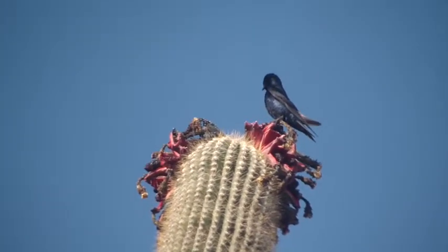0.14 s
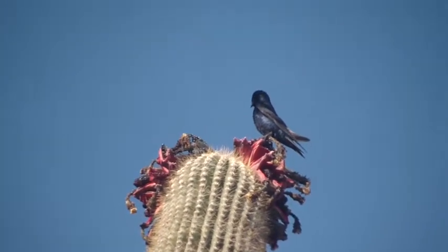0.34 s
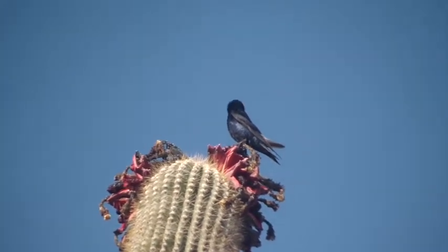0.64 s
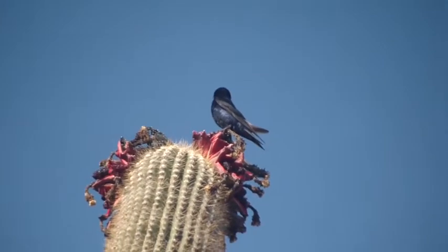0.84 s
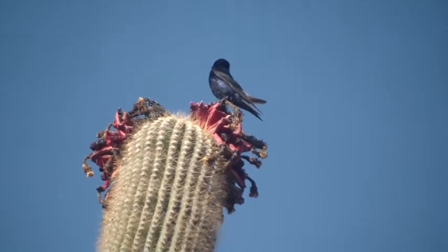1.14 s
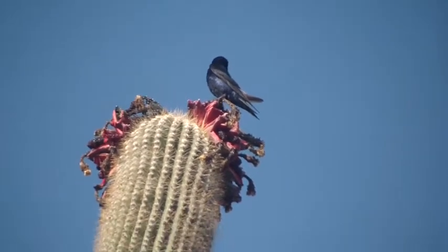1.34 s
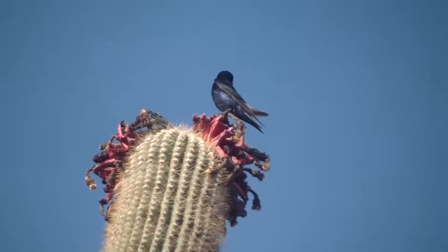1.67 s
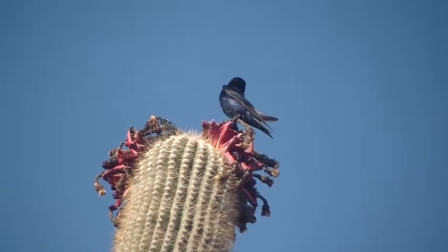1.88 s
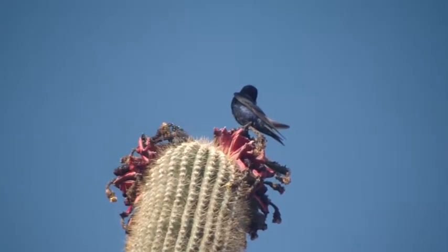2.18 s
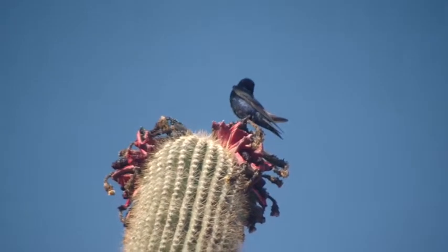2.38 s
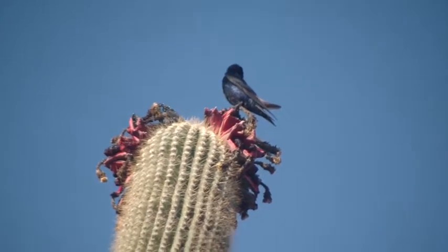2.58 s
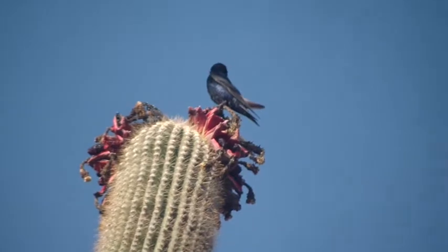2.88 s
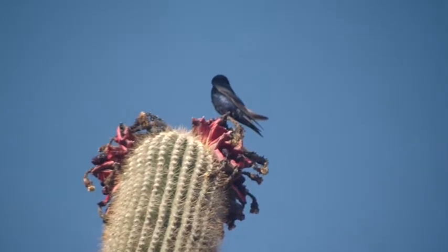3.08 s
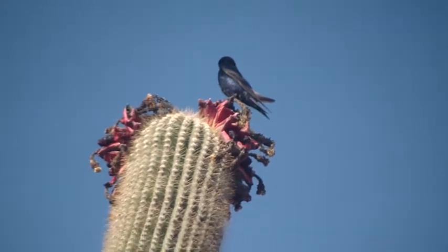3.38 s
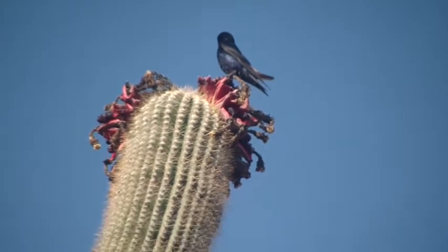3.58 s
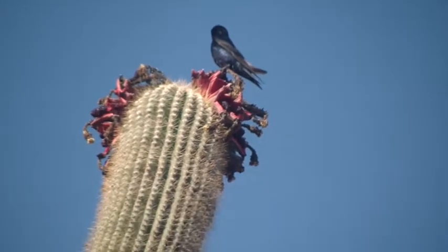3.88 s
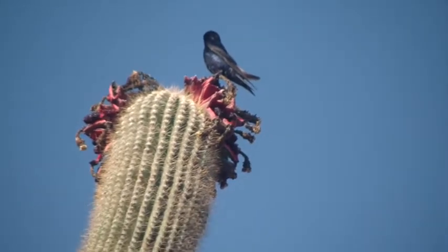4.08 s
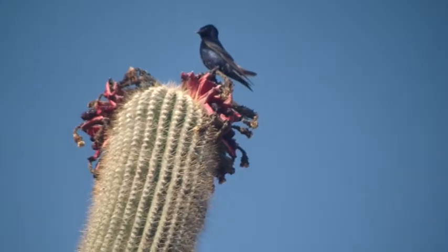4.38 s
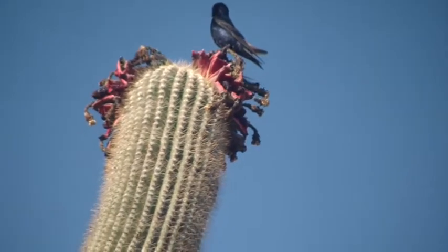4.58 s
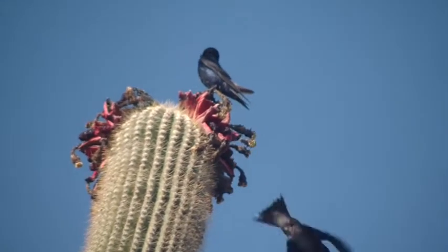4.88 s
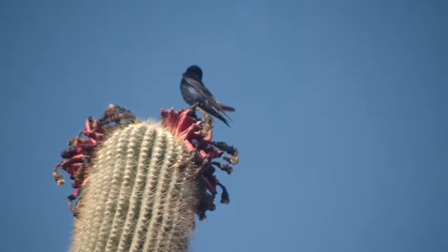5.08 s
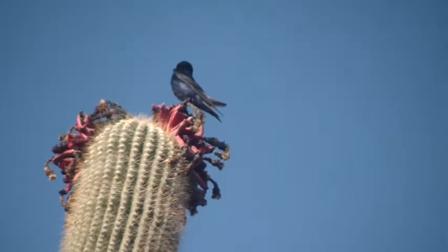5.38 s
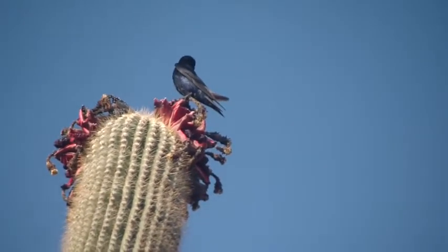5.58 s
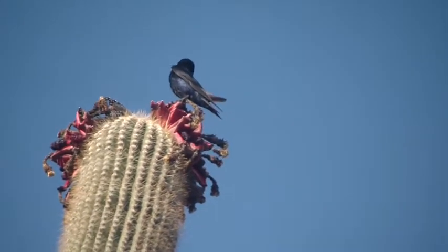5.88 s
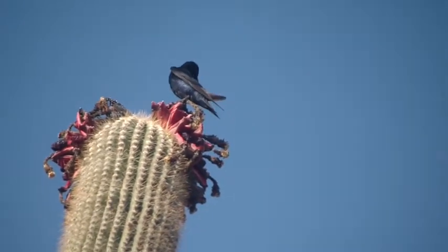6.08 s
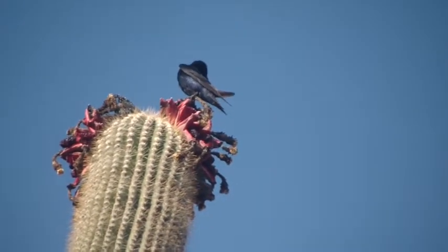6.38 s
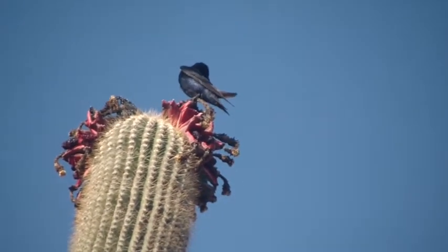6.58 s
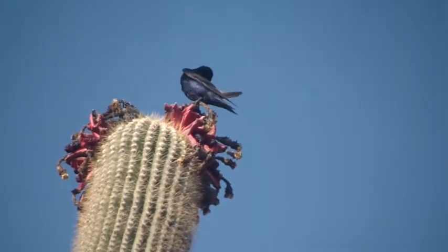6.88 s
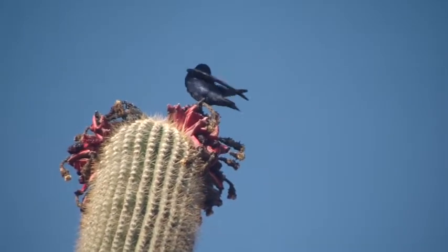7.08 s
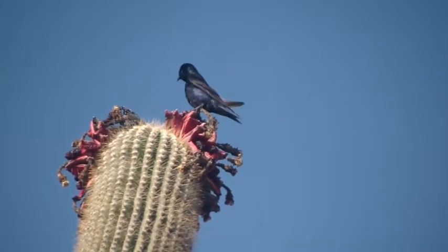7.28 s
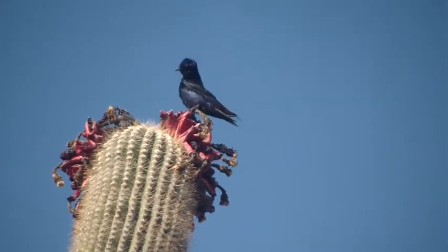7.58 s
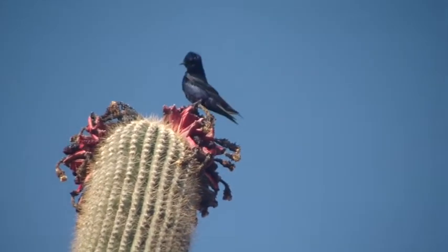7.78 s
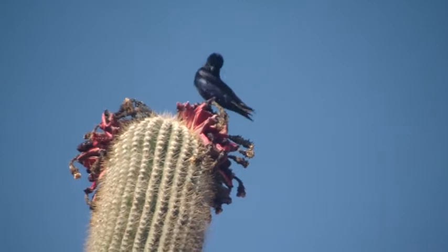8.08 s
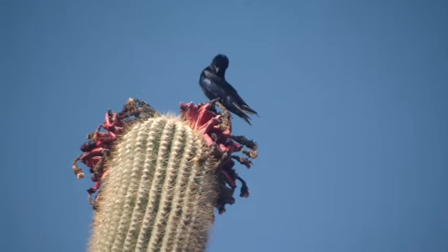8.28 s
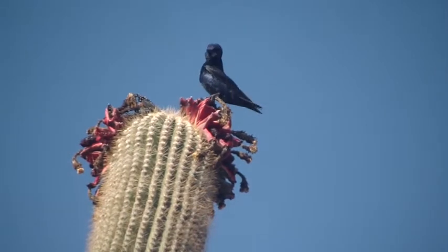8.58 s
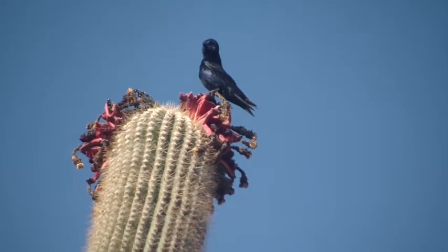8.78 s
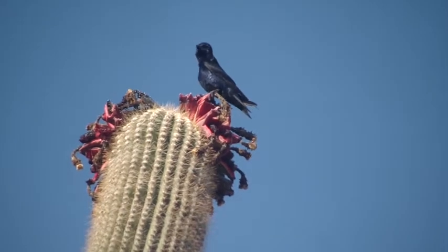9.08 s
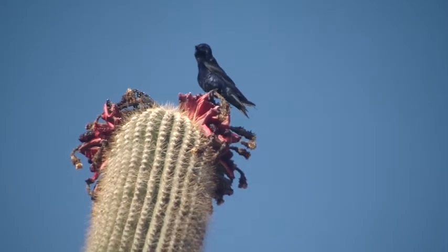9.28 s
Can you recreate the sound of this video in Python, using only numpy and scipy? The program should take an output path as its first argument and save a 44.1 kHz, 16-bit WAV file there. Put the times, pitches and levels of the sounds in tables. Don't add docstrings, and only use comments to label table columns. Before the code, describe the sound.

A small outdoor camera microphone picks up low wind buffeting at first, with soft dove coos and faint repeated birdsong far away. A quieter stretch follows, broken by one feathery clap. Near the end a close perched songbird purrs in gurgling rolls and trills, then bursts into bright slurred calls, chatter and gliding whistles, with a slight open-air echo above soft hiss and a faint engine drone.

```python
import sys
import numpy as np
from scipy import signal
from scipy.fft import rfft, irfft
from scipy.io import wavfile
from scipy.ndimage import uniform_filter1d

SR = 44100
rng = np.random.default_rng(int(sys.argv[2]) if len(sys.argv) > 2 else 0)


def persist_wave(psi):
    counts = np.round(np.clip(psi, -1, 1) * 32767).astype(np.int16)
    wavfile.write(sys.argv[1], SR, np.atleast_2d(counts).T)


def field_ratio(decibels):
    return 10 ** (np.asarray(decibels, dtype=float) / 20)


N = 416744

# (time [s], level [dB], lift of the middle pitch [factor])
ROLLS = [
    (6.137, -29, 0.96),
    (6.379, -28, 1.005),
    (7.076, -21.5, 1.06),
]
# (length [ms], start [Hz], middle [Hz], end [Hz], level [dB])
ROLL_SWEEPS = [
    (6, 2200, 2050, 1500, -11.5),
    (13.9, 2540, 1810, 1050, -7),
    (20.8, 2510, 1840, 1030, -2),
    (32, 2550, 1880, 1350, -1.5),
    (33.5, 2400, 1980, 1340, 0.9),
    (22.3, 2500, 2180, 1940, 0.3),
]
ROLL_GAP_S, ROLL_SLOWING = .0148, 1.19
# (time [s], first stroke after the start of the lead-in [s], peak level [dB], loudest
TRILLS = [
    (6.673, 0.014, -30.5, 3.1),
    (6.88, 0.017, -26, 3.04),
    (7.422, .018, -23.5, 2.45),
]
# (length [ms], start [Hz], middle [Hz], end [Hz], level [dB])
LEAD_IN = (14, 2670, 2573, 1940, -6.5)
# (length [ms], start [Hz], middle [Hz], end [Hz])
TRILL_STROKE = (9.3, 2610, 2110, 1460)
TRILL_GAP_S, TRILL_ARCH_DB, TRILL_SCATTER_DB = .0099, 1.1, 1.5
# (time [s], length [ms], start [Hz], end [Hz], level [dB])
CLUCKS = [
    (9.157, 4.1, 2320, 1600, -25),
    (9.298, 5, 1900, 1490, -35),
]
# (time [s], length [ms], start [Hz], end [Hz], peak level [dB])
SLURS = [
    [(7.967, 43, 3970, 1570, -18.5), (8.005, 63, 3324, 1540, -15.5)],
    [(8.542, 45.7, 3984, 1604, -11.5), (8.584, 59, 3510, 1574, -13.5), (8.64, 19, 2390, 1800, -21)],
    [(8.76, 38, 3000, 1473, -14), (8.793, 51, 3160, 1366, -15.5), (8.846, 30, 2300.0, 1635, -20.5)],
]
SLUR_FALLEN = [.34, .53, .42]
SLUR_ACCENT = [0.27, 0.28, 0.11]
# (time [s], length [ms], start [Hz], end [Hz], level [dB])
CHATTER = [
    (8.273, 21, 3775, 1240, -19),
    (8.289, 15.7, 3730, 1320, -13.5),
    (8.305, 15.7, 3220, 1290, -13),
    (8.321, 24, 3080, 1590, -13),
    (8.34, 38, 2990, 1930, -14.5),
]
CHATTER_FALLEN, CHATTER_FLATTENS, CHATTER_ACCENT = .3, 0.0089, 0.25
# (time [s], pitch [Hz], first partial [dB], overtones [dB])
WHISTLES = [
    [(8.971, 2285, -26, -56), (8.979, 2145, -27.5, -44), (9.001, 1710, -28, -47.5), (9.032, 1466, -43, -43)],
    [(9.034, 1534, -37, -47), (9.05, 1466, -37, -25.5), (9.076, 1314, -43, -26.5), (9.086, 1110, -45, -40)],
    [(9.206, 1960, -25, -50), (9.218, 2230, -29, -51), (9.246, 2294, -21, -43), (9.264, 2226, -33, -58),
     (9.28, 2200, -56, -71)],
    [(9.298, 2840, -40, -79), (9.328, 2745, -18, -59), (9.354, 2264, -21.5, -58), (9.372, 1962, -24, -44),
     (9.41, 1870, -30, -67)],
]
THIRD_DB = -13.5
# (frequency [Hz], gain [dB])
BEAK_SHUT = [(1000, -20), (1400, -11), (1700, -5), (2000, -1), (2300, 0), (2700, -2), (3300, -4),
             (4200, -6), (5500, -16), (8000, -18), (15000, -18)]
# (frequency [Hz], gain [dB])
BEAK_OPEN = [(1000, -20), (1500, -7), (1900, -5), (2400, -0.5), (2900, 0.5), (3300, 3.5), (3700, -1.5),
             (4200, -3.5), (5000, -11), (6300, -13.5), (7800, -10), (9700, -1), (11500, -13.5), (14500, -4)]
# (frequency [Hz], gain [dB])
BEAK_CHOKED = [(1000, -26), (1500, -2.5), (1950, -10), (2350, -2), (3500, 0.5), (5200, -13.5), (9700, -7.5),
               (14500, -4)]
PARTIALS_DB = [0, -15.5, -21.5, -22.5, -26, -37, -20, -36, -38]
GROUND_MS, GROUND_DB = 6.75, -9
SCRUB_T60_S, SCRUB_DB = .07, -18
LAND_T60_S, LAND_DB = 0.63, -26

# (time [s], level [dB])
PHRASE_STARTS = [
    (.42, -53),
    (1.293, -53),
    (2.181, -51.5),
    (3.18, -53.5),
    (4.457, -51.5),
]
# (time from phrase start [s], length [ms], start [Hz], end [Hz], level [dB])
OPENING_AND_CLOSE = [
    (0, 14, 2430, 2080, 3.5),
    (.012, 30, 2070, 2040, 4.5),
    (.012, 46, 3110, 2900, -5),
    (.048, 14, 1950, 1700, 4),
    (.062, 10, 1750, 1950, -2),
    (.296, 20, 2660, 2000, -10),
]
# (time from figure start [s], length [ms], start [Hz], end [Hz], level [dB])
FIGURE = [
    (0, 20, 2833, 2705, -4),
    (.021, 24.5, 2472, 1665, 3),
    (.043, 12, 1700, 1900, -3),
    (.056, 9.9, 2520, 2230, -3),
]
FIGURE_S, FIGURE_EVERY_S, FIGURE_FALLEN = .075, .0665, 0.293
# (time [s], length [ms], start [Hz], end [Hz], level [dB])
STRAYS = [
    (1.99, 60.6, 2830, 4020, -60),
    (4.12, 60.1, 2600, 2095, -62),
    (5.951, 106.6, 3150, 2560, -59),
    (7.70, 76.4, 3040, 1960, -55),
    (.795, 32, 2460, 4000, -56.5),
    (4.505, 30.45, 3250, 4260, -62),
]
# (time [s], level [dB], pitch [Hz])
PIPS = [(1.4845, -53, 3880), (1.5858, -50.5, 3930), (1.702, -51.5, 3900), (5.4385, -56, 3850),
        (5.7394, -49, 3930), (5.94, -48, 3900), (6.0561, -50, 3860), (6.9735, -50, 3940),
        (7.225, -48, 3860), (7.3407, -52.5, 3900), (7.4579, -59, 3840), (7.5747, -51, 3900),
        (8.4412, -52, 3970)]

# (time [s], length [s], pitch [Hz], peak level [dB], loudest at part of the length [0-1])
COOS = [
    (.095, 0.51, 458, -38, .2),
    (1.085, 0.63, 458, -38, .41),
    (2.07, 0.41, 454, -54.5, .7),
]
COO_ATTACK_S, COO_RELEASE_S, COO_CUT_S = .05, 0.163, .025
COO_EDGE_DB, COO_SHOULDER_DB, COO_TAIL_DB = -22, -4, -12.5
COO_SCOOP, COO_CREST, COO_CREST_S, COO_SAG = 0.97, 1.018, 0.078, 0.95
# (time [s], length [ms], start [Hz], end [Hz], level [dB])
FAR_COOS = [(0, 110, 434, 458, -57.5), (.22, 200, 690, 670, -68.5), (.42, 201, 594, 566, -64),
            (1.05, 199, 684, 683, -64), (1.45, 223, 636, 594, -64), (1.74, 380, 419, 416, -61),
            (1.92, 150, 722, 677, -69), (2.2, 258, 601, 604, -63), (2.45, 348, 692, 610, -71),
            (3.2, 275, 640, 596, -65.5), (4.0, 504, 672, 618, -66.5), (4.85, 219, 655, 633, -66)]

# (time [s], level [dB])
CLAP = [
    (4.6733, -27),
    (4.6736, -31.5),
    (4.676, -29),
    (4.678, -40),
]
# (frequency [Hz], width [Hz], level [dB])
WING_BANDS = [(1195, 320, 7.5), (2300, 1000, 1.5), (4040, 1100, 0), (6070, 1200, -5), (8300, 1200, -7)]

# (time [s], level [dB])
GUST = [
    (0.0, -46),
    (0.216, -30.5),
    (0.41, -46.5),
    (0.554, -45),
    (0.704, -27),
    (1.25, -43),
    (1.4, -40),
    (1.528, -61),
    (1.7, -50),
]
# (time [s], length [s], first peak [dB], fade [dB per s], pitch [Hz])
BURSTS = [
    [(.172, .1, -11.5, 140, 66), (.64, .02, -24, 0, 70), (.714, .27, -11, 59, 71.6),
     (.706, .08, -20, -60, 162), (1.04, .02, -27, 0, 60), (1.39, .02, -27, 0, 100)],
    [(.026, .02, -20, 0, 61), (.19, .15, -14.5, 75, 67), (.7, .02, -13, 0, 65), (.772, .13, -21, 30, 111),
     (.94, .02, -18.5, 0, 166), (1.08, .14, -24, 25, 59), (1.3, .02, -24, 1, 58.4),
     (1.38, .02, -20, 0, 69.6)],
]
EDDY_GAP_S, EDDY_SPREAD, EDDY_SCATTER_DB = .033, 0.31, 0.5

# (time [s], frequency [Hz], level [dB])
MOTOR = [
    (0, 144.8, -53.5),
    (3, 143.5, -57),
    (5.702, 144.9, -57.5),
    (5.9, 170.6, -53.5),
    (7.5, 174.2, -55),
    (9.45, 173, -50.5),
]
# (time [s], length [s], frequency [Hz], level [dB])
INSECTS = [
    (1.5, .3, 6600, -69),
    (3.3, .35, 6600, -65),
    (4.503, 0.11, 6747, -67),
    (5.797, 0.46, 8000, -64.5),
    (6.55, .2, 8000, -61),
]
# (frequency [Hz], level [dB per Hz])
AIR = [(12, -40), (20, -7.5), (65, 0), (107, -4), (146, -4.5), (198, -11), (255, -11.5), (367, -17.5),
       (759, -21.5), (2140, -26.5), (3070, -26), (7730, -31), (14300, -34.5), (16000, -34)]
AIR_DB = -45
# (frequency [Hz], likeness [0-1])
AIR_ALIKE = [(30, 0.96), (200, 0.66), (500, 0.19), (1500, 0.21), (4000, 0.06), (12000, 0.08)]
TOP_HZ = 15750


def along(table, hz):
    f, v = np.transpose(table)
    return np.interp(np.log(hz), np.log(f), v)


def band(x, lo_hz, hi_hz):
    return signal.sosfilt(signal.butter(2, [lo_hz, hi_hz], "bandpass", fs=SR, output="sos"), x)


def unit(x):
    return x / np.sqrt(np.mean(x ** 2))


def walk(rate, size=N):
    k = int(SR / rate)
    held_levels = np.repeat(rng.standard_normal(size // k + 1), k)
    return 1.378 * uniform_filter1d(uniform_filter1d(held_levels, k), k)[:size]


def add(out, s, sound):
    i = int(s * SR)
    out[i:i + len(sound)] += sound[:len(out) - i]


def vibrate(hz, gains):
    phase = 2 * np.pi * np.cumsum(hz) / SR + 7 * rng.random()
    return sum(g * (hz * k < .45 * SR) * np.sin(k * phase) for k, g in enumerate(gains, 1))


def bent(rows, fallen):
    return [(s, ms, a, a * (c / a) ** fallen, c, db) for s, ms, a, c, db in rows]


def sweeps(rows, throat, partials_db, rise, fall, patchy_db, effort=0, late_db=8, accents=None):
    out = np.zeros(N)
    for n, (s, ms, a, b, c, db) in enumerate(rows):
        u = np.linspace(0, 1, int(ms * SR / 1000))
        hz = a ** ((1 - u) * (1 - 2 * u)) * b ** (4 * u * (1 - u)) * c ** (u * (2 * u - 1))
        fade_in = np.sin(np.pi / 2 * np.clip(u / rise, 0, 1))
        swell = fade_in * np.sin(np.pi / 2 * np.clip((1 - u) / fall, 0, 1))
        if accents:
            swell = swell * field_ratio(-np.maximum(30 * (accents[n] - u), 12 * (u - accents[n])))
        levels = [patchy_db * walk(253, size=len(u))]
        for p in partials_db[1:]:
            lag = late_db * (1 - u) ** 2
            levels.append(p + effort * (db + 20) - lag + 4.5 * walk(150, size=len(u)))
        gains = [field_ratio(db + p + along(throat, k * hz)) for k, p in enumerate(levels, 1)]
        add(out, s, swell * vibrate(hz, gains))
    return out


def held(tables, upper_db, edge_s):
    out = np.zeros(N)
    for table in tables:
        s, hz, *db = np.transpose(table)
        t = np.arange(s[0], s[-1], 1 / SR)
        hz = np.interp(t, s, hz)
        db = [np.interp(t, s, curve) for curve in db]
        top = np.max(db, axis=0)
        for k, p in enumerate(upper_db, len(db) + 1):
            db.append(top + p + along(BEAK_OPEN, k * hz) + 4 * walk(89, size=len(t)))
        edge = np.clip(np.minimum(t - s[0], s[-1] - t) / edge_s, 0, 1)
        add(out, s[0], np.sqrt(2) * edge * vibrate(hz, field_ratio(np.array(db))))
    return out


def scatter(x, t60_s, db, start_ms, spread):
    t = np.arange(int(1.2 * SR)) / SR
    noise = band(rng.standard_normal((2, len(t))), 1500, 3600)
    mid, side = noise * field_ratio(-60 * t / t60_s) * (t > start_ms / 1000)
    tail = np.array([mid + spread * side, mid - spread * side]) / np.sqrt(np.sum(mid ** 2))
    return field_ratio(db) * signal.fftconvolve(x[None], tail, axes=1)[:, :N]


def burrs():
    rows = []
    for s, db, lift in ROLLS:
        for k, (ms, a, b, c, d) in enumerate(ROLL_SWEEPS):
            late = ROLL_GAP_S * (ROLL_SLOWING ** k - 1) / (ROLL_SLOWING - 1)
            rows.append((s + late, ms, a, lift * b, c, db + d))
    ms, a, b, c = TRILL_STROKE
    for s, wait, db, top in TRILLS:
        rows.append((s, *LEAD_IN[:-1], db + LEAD_IN[-1]))
        for k, (loud, long, mid, low) in enumerate(rng.standard_normal(size=(7, 4))):
            level = db - TRILL_ARCH_DB * (k - top) ** 2 + TRILL_SCATTER_DB * loud
            rows.append((s + wait + k * TRILL_GAP_S, ms * (1 + 0.132 * long),
                         a, b * (1 + 0.038 * mid), c * (1 + 0.055 * low), level))
    return rows


def slurs():
    rows, accents = [], []
    for call in SLURS:
        for row, fallen, accent in zip(call, SLUR_FALLEN, SLUR_ACCENT):
            rows += bent([row], fallen)
            accents.append(accent)
    return sweeps(rows, BEAK_OPEN, PARTIALS_DB, rise=.08, fall=.12, patchy_db=.8, accents=accents)


def chatter():
    rows = []
    for k, row in enumerate(CHATTER):
        rows += bent([row], CHATTER_FALLEN - k * CHATTER_FLATTENS)
    return sweeps(rows, BEAK_CHOKED, PARTIALS_DB, rise=.08, fall=.12, patchy_db=1.2, late_db=12,
                  accents=[CHATTER_ACCENT] * len(CHATTER))


def whistles():
    notes = [[(*row, row[-1] + THIRD_DB) for row in note] for note in WHISTLES]
    return held(notes, [-26.5, -31, -26.0, -30, -32, -27, -25], edge_s=0.0034)


def singer():
    voice = sweeps(burrs() + bent(CLUCKS, .6), BEAK_SHUT, PARTIALS_DB, rise=.18, fall=.2,
                   patchy_db=1.5, effort=.5, late_db=30)
    voice += slurs() + chatter() + whistles()
    ground = field_ratio(GROUND_DB) * np.roll(band(voice, 580, 11200), int(GROUND_MS * SR / 1000))
    near = (voice + ground) * field_ratio(np.array([[-.2], [.2]]))
    scrub = scatter(voice, SCRUB_T60_S, SCRUB_DB, GROUND_MS, 0.33)
    return near + scrub + scatter(voice, LAND_T60_S, LAND_DB, 3.8, 0.24)


def far_birds():
    figures = [(FIGURE_S + k * FIGURE_EVERY_S + t, *rest) for k in range(3) for t, *rest in FIGURE]
    phrase = bent(OPENING_AND_CLOSE, 0.38) + bent(figures, FIGURE_FALLEN)
    rows = []
    for s, db in PHRASE_STARTS:
        for t, ms, a, b, c, d in phrase:
            start = s + t + 0.0023 * rng.standard_normal()
            rows.append((start, ms, a, b, c, db + d + 1.8 * rng.standard_normal()))
    rows += [(s - .003, 11, 0.967 * hz, hz, 0.88 * hz, db - 4.0) for s, db, hz in PIPS]
    throat = [(1700, -6), (2000, -4), (2350, 1.5), (3000, 2.5), (4000, 5.5)]  # (frequency [Hz], gain [dB])
    voice = sweeps(rows + bent(STRAYS, 0.48), throat, [0], rise=0.16, fall=0.29, patchy_db=1.4)
    return voice + scatter(voice, .45, -14, 8, .6)


def coo(s, length, hz, db, top):
    release, cut = length - COO_RELEASE_S, length - COO_CUT_S
    t = np.sort([0, COO_ATTACK_S, COO_CREST_S, top * length, release, cut, length])
    pitch = np.interp(t, [0, COO_ATTACK_S, COO_CREST_S, release, length],
                      [COO_SCOOP, 1, COO_CREST, .995, COO_SAG])
    peak = min(top * length, release - .01)
    level = np.interp(t, [0, COO_ATTACK_S, peak, release, cut, length],
                      [COO_EDGE_DB, COO_SHOULDER_DB, 0, COO_SHOULDER_DB, COO_TAIL_DB, COO_EDGE_DB])
    return np.transpose([s + t, hz * pitch, db + level])


def dove():
    far = sweeps(bent(FAR_COOS, 0.342), [(400, 0), (800, 0)], [0], rise=0.12, fall=0.14, patchy_db=5.5)
    near = held([coo(*row) for row in COOS], [-34], edge_s=0.016)
    return near * field_ratio(np.array([[-.3], [.3]])) + far


def wing():
    slaps = np.zeros(N)
    for s, db in CLAP:
        add(slaps, s, field_ratio(db) * rng.standard_normal(40) * np.exp(-np.arange(40) / 12))
    sound = sum(field_ratio(db + 13.5) * band(slaps, hz - width / 2, hz + width / 2) for hz, width, db in WING_BANDS)
    return sound + scatter(sound, 0.079, -21, 7.5, 0.71)


def eddies(start, length, db, fade_db, hz):
    gap, size, loud = rng.standard_normal(size=(12, 3)).T
    late = np.cumsum(EDDY_GAP_S * np.exp(0.2924 * gap))
    late -= late[0]
    later = late > 0
    pitch = hz * np.exp(EDDY_SPREAD * np.clip(size + 0.31, -1, 1) * later)
    level = db - fade_db * late + EDDY_SCATTER_DB * loud * later
    return np.transpose([start + late, pitch, level])[late < length]


def flutter(db):
    return field_ratio(db - 2.5 + 5.7 * walk(18.15)) * unit(band(rng.standard_normal(N), 22.6, 78))


def gusts():
    s, db = np.transpose(GUST)
    gust_db = np.interp(np.arange(N) / SR, s, db, right=-90)
    out = np.array([flutter(gust_db) for _ in range(2)])
    for port, bursts in zip(out, BURSTS):
        for s, hz, db in np.vstack([eddies(*burst) for burst in bursts]):
            turn = np.arange(-1.5, 1.5, hz / SR)
            thump = field_ratio(db) * np.exp(-(turn / 0.45) ** 2) * np.cos(2 * np.pi * (turn + rng.random()))
            add(port, max(s - 1.5 / hz, 0), thump)
    return out


def motor():
    s, hz, db = np.transpose(MOTOR)
    t = np.arange(N) / SR
    pitch = np.interp(t, s, hz) * (1 + 0.01342 * walk(6.6))
    return np.sqrt(2) * vibrate(pitch, [field_ratio(np.interp(t, s, db) + 2.44 * walk(9))])


def insects():
    t = np.arange(N) / SR
    out = np.zeros(N)
    for s, length, hz, db in INSECTS:
        buzz = unit(band(rng.standard_normal(N), 0.92 * hz, 1.08 * hz))
        out += field_ratio(db) * np.exp(-(2 * (t - s) / length) ** 2) * buzz
    return out


def air():
    hz = np.maximum(np.arange(N // 2 + 1) * SR / N, 1)
    alike = np.clip(along(AIR_ALIKE, hz), 0, 1)
    colour = field_ratio(along(AIR, hz))
    mid = irfft(rfft(rng.standard_normal(N)) * colour * np.sqrt(1 + alike), N)
    side = irfft(rfft(rng.standard_normal(N)) * colour * np.sqrt(1 - alike), N)
    both = np.array([mid + side, mid - side]) * field_ratio(AIR_DB) / np.std(mid)
    return both + band(both, 24, 153) * (field_ratio(0.82 * walk(5.6)) - 1)


def scene():
    return singer() + far_birds() + dove() + wing() + gusts() + motor() + insects() + air()


def top_cut(x):
    return signal.sosfilt(signal.butter(12, 16460, fs=SR, output="sos"), x)


def record(dry):
    cut = signal.sosfilt(signal.ellip(10, .2, 70, TOP_HZ, fs=SR, output="sos"), dry)
    return top_cut(cut)


dry = scene()
out = record(dry)
persist_wave(out)
```